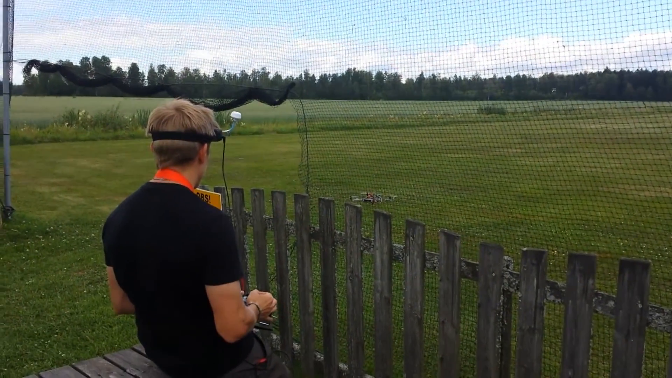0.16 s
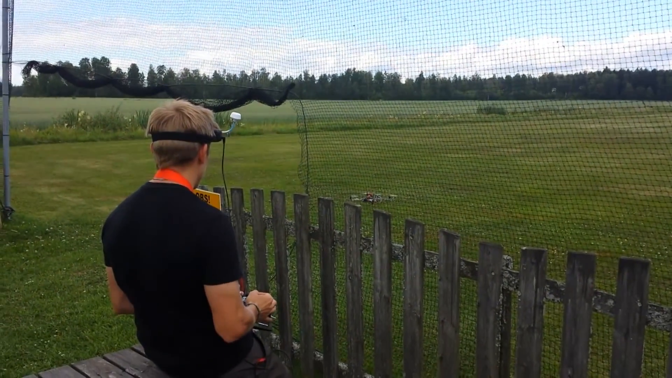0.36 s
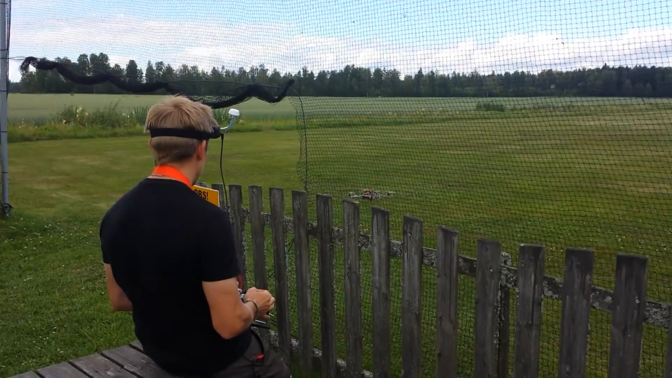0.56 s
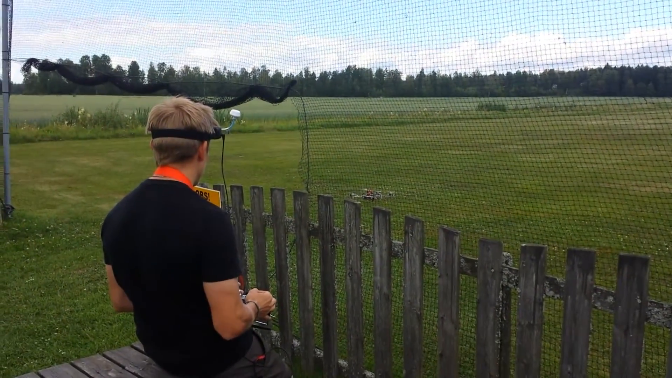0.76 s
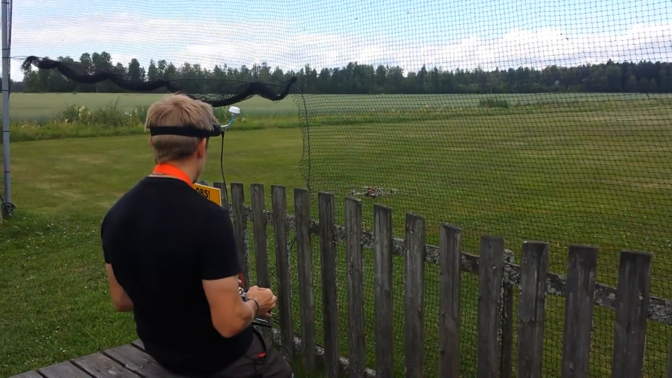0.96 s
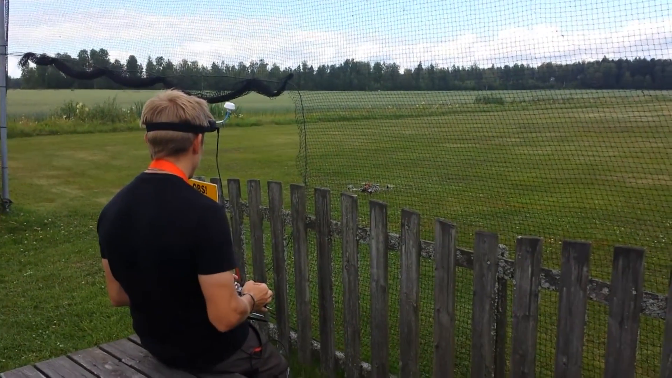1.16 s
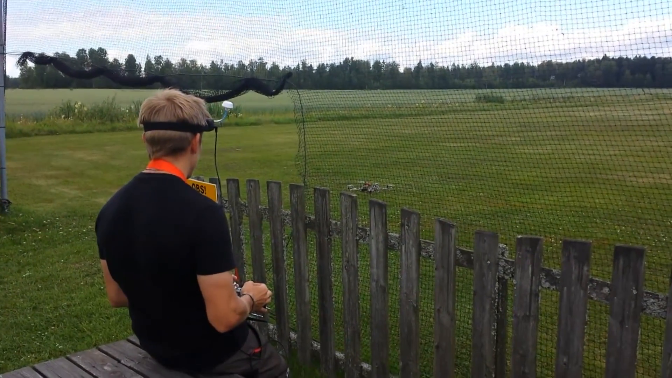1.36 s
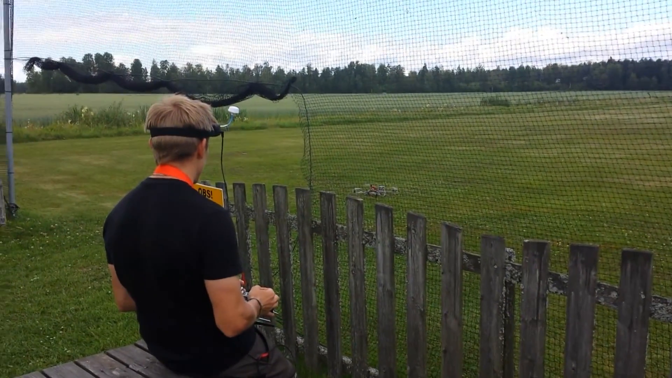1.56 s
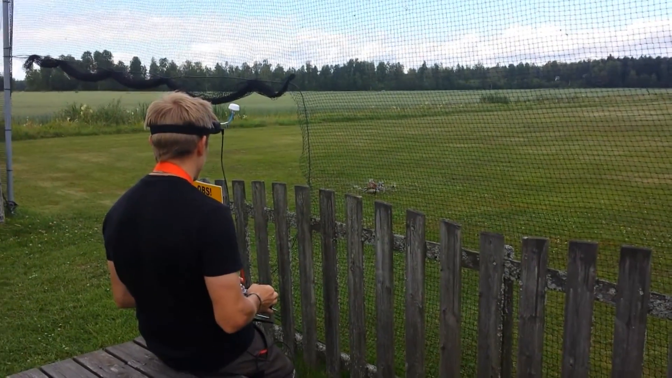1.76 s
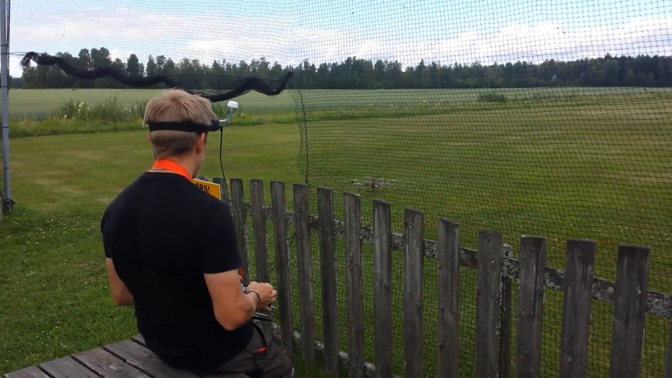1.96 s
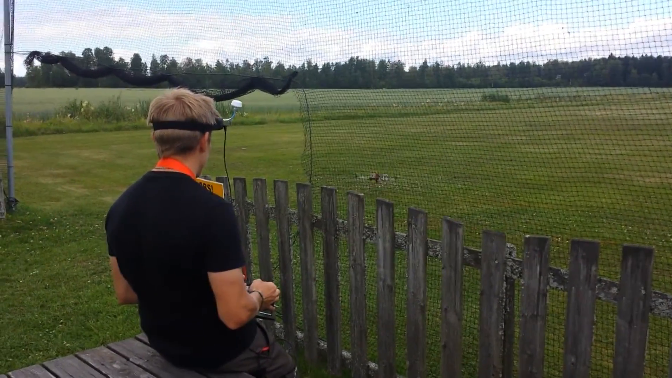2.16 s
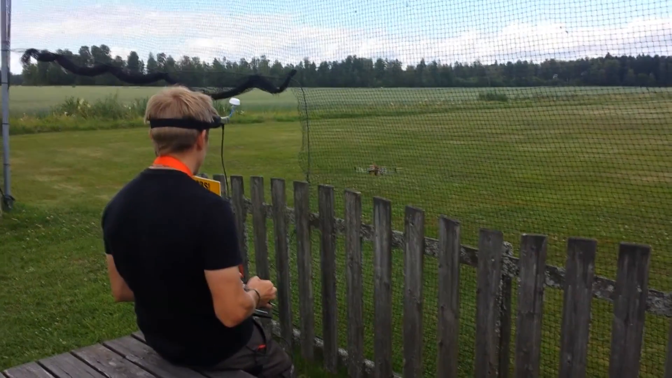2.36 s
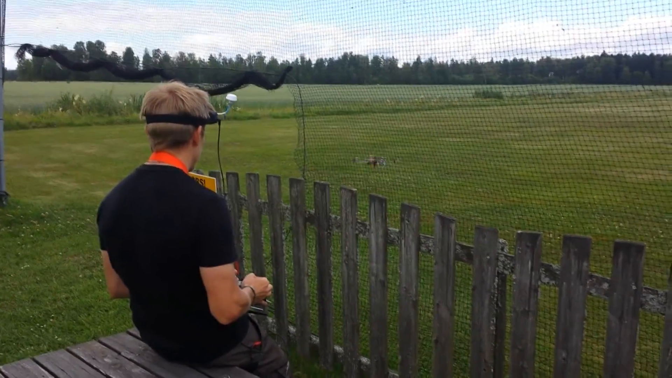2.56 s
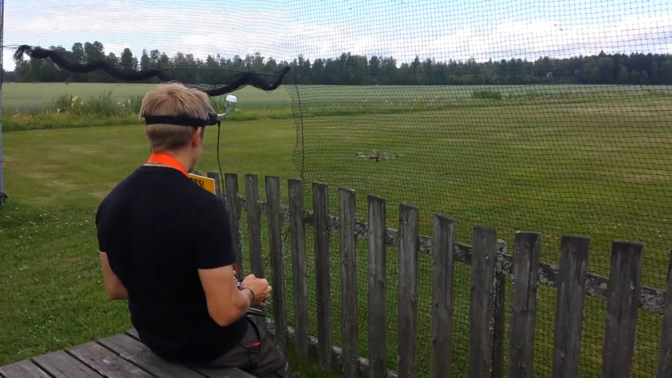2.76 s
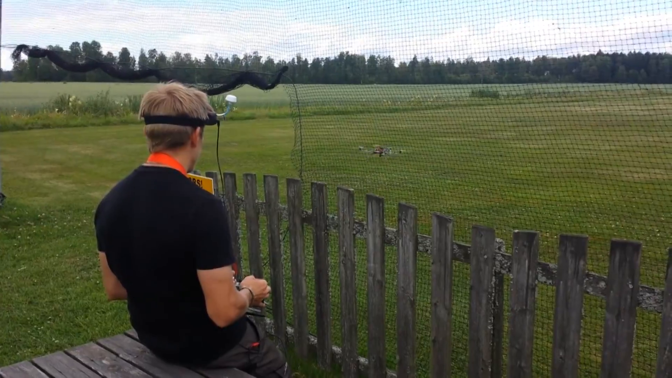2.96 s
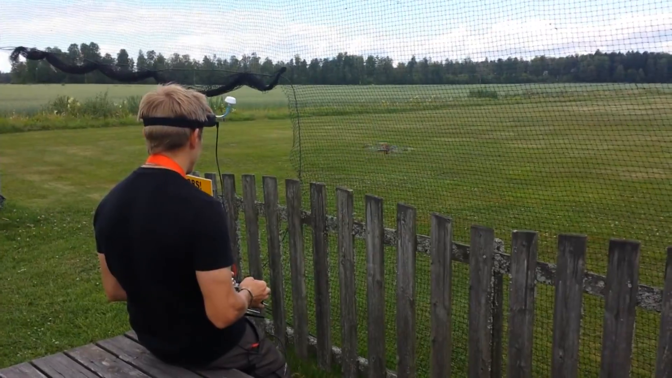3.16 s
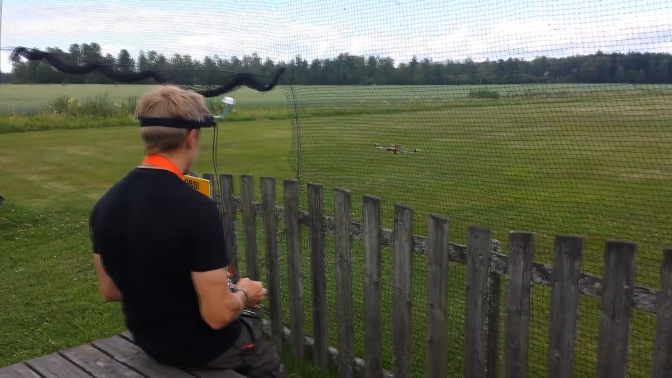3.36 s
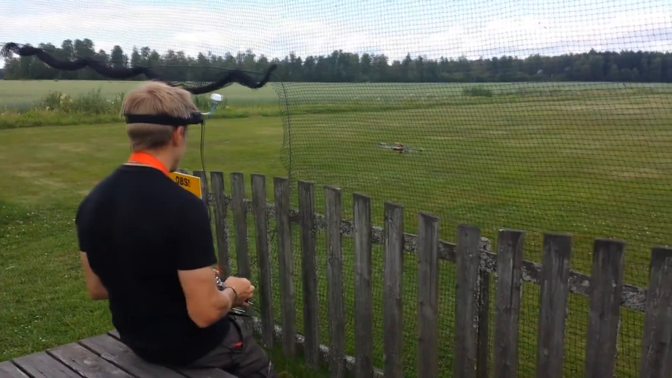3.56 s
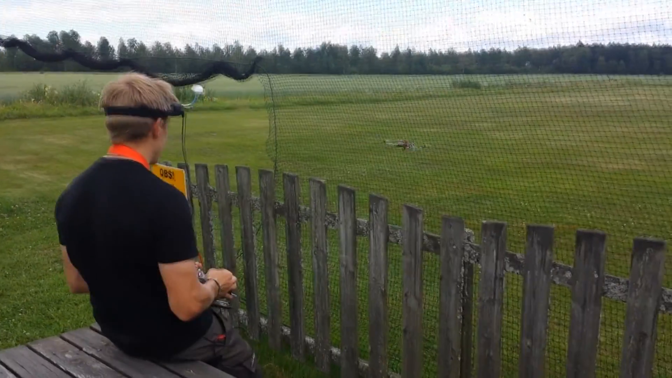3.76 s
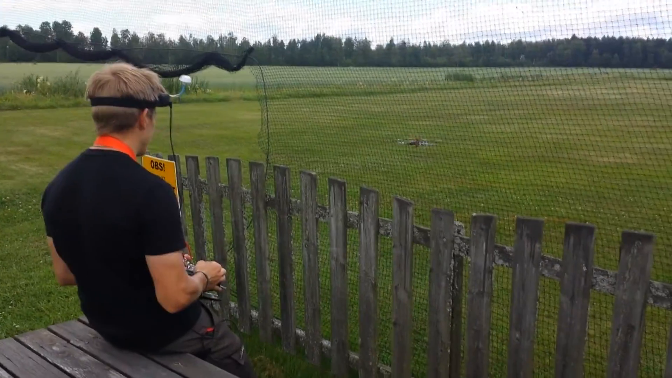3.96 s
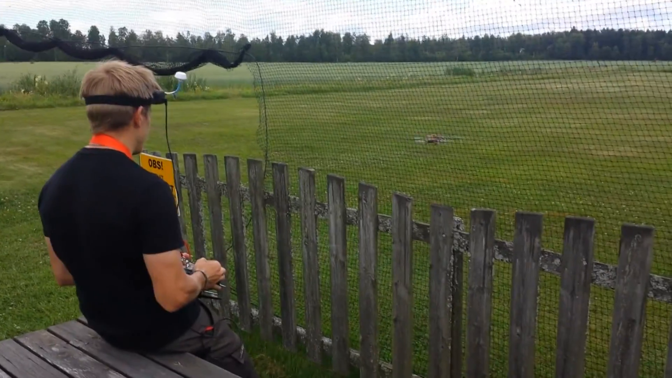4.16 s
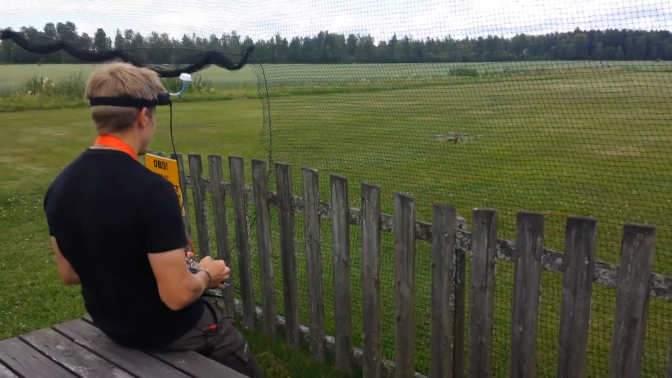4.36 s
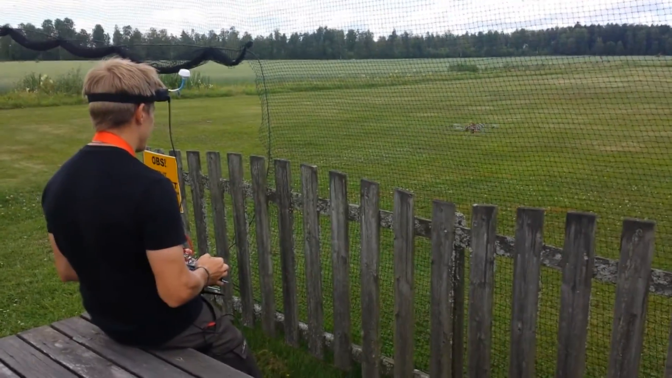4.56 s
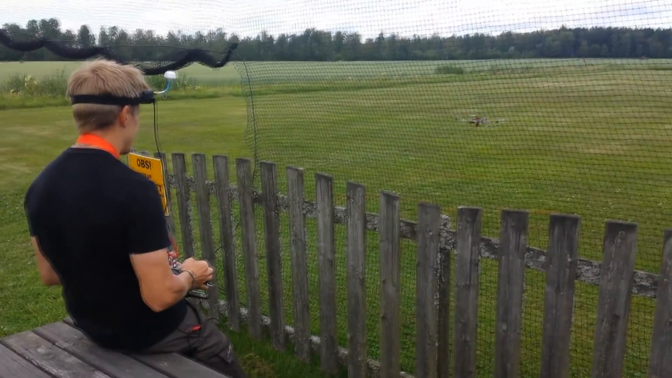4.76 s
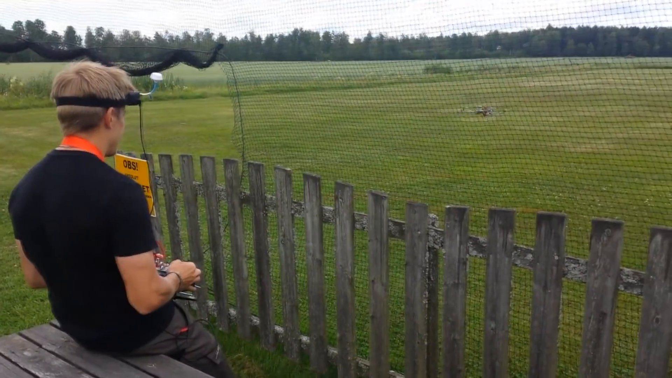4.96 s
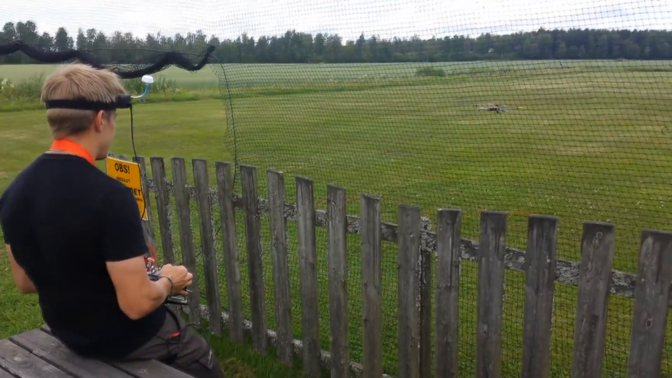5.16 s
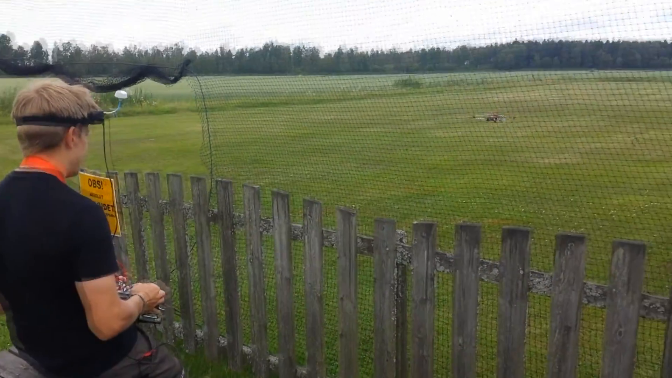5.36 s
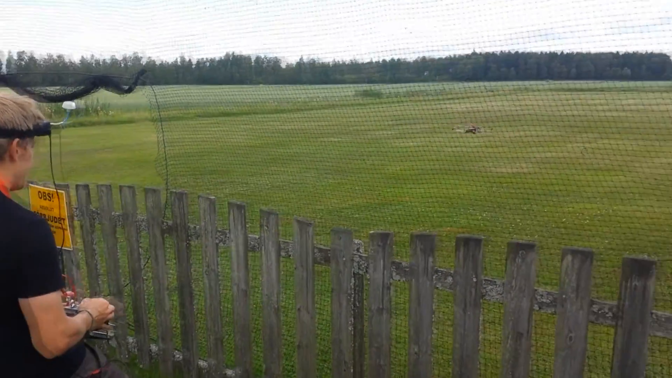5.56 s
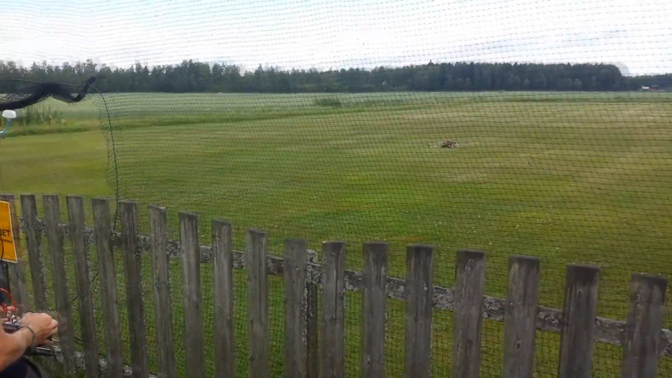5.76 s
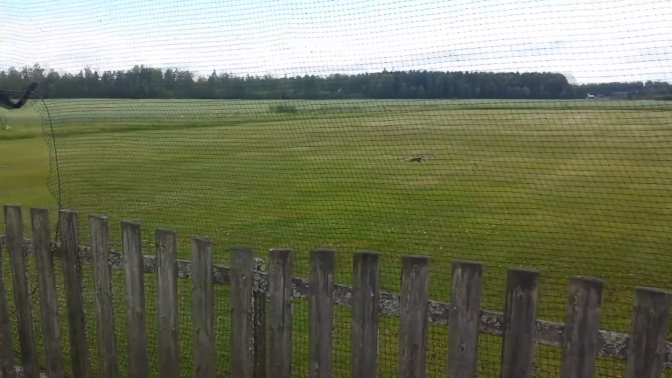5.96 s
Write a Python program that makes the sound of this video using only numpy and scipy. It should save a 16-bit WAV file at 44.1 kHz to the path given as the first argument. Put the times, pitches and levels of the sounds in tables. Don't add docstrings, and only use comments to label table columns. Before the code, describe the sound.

A small quadcopter's electric motors whine up from rest, then its propellers buzz louder as it lifts off and flies away over open grass.

```python
import sys
import numpy as np
from scipy import signal
from scipy.fft import rfft, irfft, next_fast_len
from scipy.io import wavfile
from scipy.ndimage import uniform_filter1d, map_coordinates

SR = 44100
rng = np.random.default_rng(int(sys.argv[2]) if len(sys.argv) > 2 else 0)


def makeup_ratio(level_db):
    decades = np.asarray(level_db, float) / 20
    return 10 ** decades


def unload_wav(signal):
    wavfile.write(
        sys.argv[1],
        SR,
        np.round(np.clip(np.atleast_2d(signal).T, -1, 1) * 32767).astype(np.int16),
    )


N = 264688
TIME = np.arange(N) / SR
SIZE = next_fast_len(N)
STEADY = [(0, 0)] * 4


def rms_one(x):
    return x / np.sqrt(np.mean(x ** 2) + 1e-20)


def even_out(x, span):
    power = uniform_filter1d(uniform_filter1d(x ** 2, size=span), size=span)
    return x / np.sqrt(power)


def in_time(rows):
    s, *columns = np.transpose(rows)
    return [np.interp(TIME, s, column) for column in columns]


def at_hz(points):
    hz, value = np.transpose(points)
    bins_hz = np.arange(SIZE // 2 + 1) * SR / SIZE
    return np.interp(np.log(bins_hz + 1), np.log(hz), value)


def colour(x, gain):
    return irfft(rfft(x, SIZE) * gain, SIZE)[..., :N]


def resonate(x, hz, width):
    r = np.exp(-np.pi * width / SR)
    feedback = [1, -2 * r * np.cos(2 * np.pi * hz / SR), r * r]
    return signal.lfilter([(1 - r * r) / 2, 0, (r * r - 1) / 2], feedback, x)


def flicker(depth_db, rate):
    knots = rng.standard_normal(int(rate * N / SR) + 2)
    return np.interp(TIME, np.linspace(0, N / SR, len(knots)), makeup_ratio(depth_db * knots))


def lines(multiples, levels_db, turns, base, depth_db, rate):
    out = np.zeros(N)
    for turn, (carrier, motor_db) in zip(turns, base):
        for multiple, level_db in zip(multiples, levels_db):
            phase = carrier + multiple * turn + rng.random()
            sine = np.sin(np.float32(2 * np.pi * (phase % 1)))
            out += flicker(depth_db, rate) * makeup_ratio(level_db + motor_db) * sine
    return out


# [start_s, share of the idle speed]
SPIN_UP = [(0, .38), (.1, .51), (.2, .65), (.3, .73), (.4, .79), (.55, .875), (.7, .917), (.87, 1)]


def spun_up(stretch=1):
    return np.interp(TIME / stretch, *np.transpose(SPIN_UP))


def lifted():
    lift_off_s, span_s = 1.44, 0.091
    return 1 / (1 + np.exp((lift_off_s - TIME) / span_s))


# [start_s, speed in turns per s]
FRONT_LEFT_SPEED = [(1.22, 69.3), (1.5, 75.4), (1.71, 72.7), (1.99, 83.1), (2.35, 85.6), (2.75, 73.3),
                    (2.91, 75), (3.46, 72.9), (3.72, 73.3), (3.85, 70.8), (4.15, 84.2), (4.62, 79.5),
                    (4.78, 73.6), (4.9, 71.6), (5, 72), (5.2, 68.6), (5.32, 68.6), (5.46, 69.9),
                    (5.65, 67.5), (5.82, 72.2), (6, 71.5)]
FRONT_RIGHT_SPEED = [(.9, 72.3), (1.24, 72), (1.42, 78.7), (1.85, 80.5), (2.11, 77.7), (2.35, 80.2),
                     (2.6, 77.6), (3, 80), (3.15, 78.6), (3.49, 78.6), (3.74, 75.6), (3.91, 85.6),
                     (4.13, 88.2), (4.72, 87.4), (4.9, 82), (5.15, 78), (5.52, 77.4), (6, 79.4)]
REAR_LEFT_SPEED = [(.9, 64.3), (1.27, 65.2), (1.66, 80), (2.12, 80.7), (2.3, 77.2), (2.5, 81.4),
                   (2.75, 78.2), (2.91, 83.8), (3.14, 76.6), (3.35, 83.6), (3.58, 76.8), (3.78, 81.6),
                   (3.89, 78.4), (4.06, 81.8), (4.16, 80.2), (4.29, 82.8), (4.42, 80.2), (4.52, 78.4),
                   (4.65, 80.6), (4.8, 80.6), (5.03, 73.6), (5.25, 73.9), (5.45, 71.2), (5.62, 72.2),
                   (5.88, 69.7), (6, 73)]
REAR_RIGHT_SPEED = [(.9, 69.6), (1.28, 69.8), (1.76, 84), (1.9, 82), (2.02, 76), (2.2, 71.8), (2.33, 69.4),
                    (2.45, 71.3), (2.6, 76), (2.67, 78.5), (3.1, 79), (3.36, 72.7), (3.73, 80.8),
                    (4.12, 80.2), (4.39, 85.5), (4.75, 84.6), (4.92, 81.8), (5.1, 76.8), (5.22, 76.1),
                    (5.45, 77.5), (5.68, 75.2), (5.79, 79.5), (6, 78)]
SPIN_UP_STRETCH = [.93, 1, .92, 1]


def rotor_speeds():
    tables = (FRONT_LEFT_SPEED, FRONT_RIGHT_SPEED, REAR_LEFT_SPEED, REAR_RIGHT_SPEED)
    rotors = [in_time(rows)[0] for rows in tables]
    starting = np.array([spun_up(stretch) for stretch in SPIN_UP_STRETCH])
    speeds = uniform_filter1d(starting * rotors, size=2800, mode="nearest")
    hunting = np.array([20 * np.log10(flicker(1, 16)) for rotor in rotors])
    return speeds + 0.3 * lifted() * hunting


# [start_s, pitch_hz]
SWITCHING_PITCH = [(0, 7791), (.6, 7766), (1.5, 7754), (2.1, 7761), (3, 7753), (3.6, 7755), (4.3, 7740),
                   (5.1, 7750), (6, 7742)]
# [pitch off the middle_hz, level_db]
CLOCKS = [(-7.5, 0), (7.5, -1), (-18, -13), (3, -15)]


def controller_clocks():
    middle, = in_time(SWITCHING_PITCH)
    return [(np.cumsum(middle + off_hz) / SR, level_db) for off_hz, level_db in CLOCKS]


# [start_s, bell_level_db, controller_level_db]
MOTOR_EFFORT = [(0.0, -40.5, -42), (0.58, -49.5, -41), (0.68, -33, -46.5), (0.9, -47.5, -46.5),
                (1.44, -35, -40), (1.85, -47, -28.5), (1.92, -34.5, -35), (2.09, -41.5, -36),
                (2.8, -33, -31.5), (3.48, -29.5, -28.5), (3.61, -29.5, -34.5), (3.76, -29.5, -29),
                (3.89, -29, -36), (4.55, -33, -41.5), (4.93, -30, -40), (5.06, -29.5, -34),
                (5.28, -36, -35), (5.78, -31.5, -35), (6.0, -27, -32.5)]


def motor_effort():
    return in_time(MOTOR_EFFORT)


def motors(turns):
    clocks = controller_clocks()
    level = [(clock, 0) for clock, level_db in clocks]
    tones = bell(turns, level) + solos(turns, level)
    tones += switching_tones(turns, clocks, level)
    tones += commutation(turns)
    tones += winding(turns, level)
    return np.array([tones, flicker(5.44, 60) * tones])


MAGNET_MULTIPLES = [56, 63, 68, 70, 72, 77, 84]
MAGNET_LEVELS = [-4, -1, -5, -1, -5, -4, -4]
LOW_NEIGHBOURS = [-35, -28, -21]
LOW_NEIGHBOUR_LEVELS = [-2, 4, 4]
# [pitch_hz, width_hz, level_db]
BELL_RINGS = [(4930, 70, 6), (5450, 350, 4)]
# [pitch_hz, level_db]
WHINE = [(3000, -62), (4300, 0), (4900, 17.5), (5500, 2.5), (6300, -10), (9000, -8.5)]


def bell(turns, clocks):
    force = lines(MAGNET_MULTIPLES, MAGNET_LEVELS, turns, STEADY, 5.0, 8)
    force += lines(LOW_NEIGHBOURS, LOW_NEIGHBOUR_LEVELS, turns, clocks, 5.0, 6.4)
    rough_db = np.interp(TIME, [.35, .55], [27, 0])
    force += makeup_ratio(rough_db - 7) * flicker(6, 13) * rng.standard_normal(N)
    ringing = force + sum(makeup_ratio(level_db) * resonate(force, hz, width) for hz, width, level_db in BELL_RINGS)
    ringing = even_out(colour(ringing, makeup_ratio(at_hz(WHINE))), 6000)
    locked = np.interp(TIME, [.45, .6], [0, 1])
    song = locked * makeup_ratio(-3) * singing(turns, clocks)
    return makeup_ratio(motor_effort()[0]) * (makeup_ratio(-6 * locked) * ringing + song)


SINGING_MAGNETS = [63, 70]
SINGING_NEIGHBOURS = [-35, -28]
# [magnet_low_db, magnet_high_db, neighbour_low_db, neighbour_high_db]
MOTOR_VOICES = [(-9, -1, -5, -4), (-9, -8, -6, 0), (-14, -3, 1, -4), (-6, -7, -3, -4)]
# [pitch_hz, width_hz, level_db]
SHARP_RINGS = [(4900, 380, 0), (5330, 520, -3.5)]


def singing(turns, clocks):
    force = 0
    for turn, clock, voice_db in zip(turns, clocks, MOTOR_VOICES):
        force = force + lines(SINGING_MAGNETS, voice_db[:2], [turn], STEADY, 2.0, 6)
        force = force + lines(SINGING_NEIGHBOURS, voice_db[2:], [turn], [clock], 2.0, 6) * lifted()
    song = 0
    for hz, width, level_db in SHARP_RINGS:
        song = song + makeup_ratio(level_db) * resonate(resonate(force, hz, width), hz, width)
    unloaded = np.interp(TIME, [.45, .75, 1.29, 1.34], [0, 1, 1, 0])
    alone = lines([71], [-2], turns[1:2], STEADY, 2.5, 6)
    return flicker(2.04, 40) * (song + unloaded * alone)


SOLO_TONES = dict(a=(1, -70), b=(0, -56), c=(2, -63), d=(1, -49), e=(1, 42), f=(1, 84), g=(1, 71),
              h=(0, 70), i=(2, 70), j=(3, -35), k=(0, -35), l=(2, -35), m=(3, 63), n=(1, -35), o=(1, -28),
              p=(0, 66), q=(0, 74), r=(0, -28), s=(2, -35), t=(2, -28), u=(3, -28), v=(2, -21), w=(2, -21),
              x=(3, 70), y=(2, 84), z=(1, 56))
# [middle_s, half_length_s, level_db]
SOLO_SWELLS = dict(a=[(.14, 0.027, -39)], b=[(.29, 0.039, -43)], c=[(.3, 0.014, -38.5)],
               d=[(.41, 0.032, -45)], e=[(.1, 0.035, -69), (.22, .06, -80), (.35, 0.077, -55)],
               f=[(.11, 0.032, -63), (.22, 0.046, -64)], g=[(.7, 0.017, -29.5), (.9, 0.035, -43)],
               h=[(.8, 0.044, -38), (1.3, 0.025, -32), (5.29, 0.11, -25), (5.55, 0.11, -28)],
               i=[(1.41, 0.016, -29.5)], j=[(1.68, 0.016, -32), (4.8, 0.039, -26.5), (4.92, 0.087, -26.5),
               (5.28, 0.19, -33)], k=[(1.9, 0.048, -31), (3.75, 0.041, -28.5), (4.02, 0.041, -30)],
               l=[(2.3, 0.81, -39), (3.2, 0.32, -38), (3.93, 0.093, -32), (1.94, 0.039, -28.5),
               (2.13, 0.033, -31.5), (2.51, 0.027, -28), (2.81, 0.02, -27.5), (3.01, 0.04, -28),
               (3.27, 0.017, -29.5), (3.45, 0.029, -26), (3.74, 0.084, -23.5), (4.1, 0.037, -48),
               (4.36, 0.045, -30)], m=[(2.67, 0.086, -30), (5.85, 0.083, -28.5), (5.99, 0.058, -24.5)],
               n=[(2.02, 0.058, -32.5), (3.1, 0.024, -34.5)], o=[(3.95, 0.065, -38), (4.2, 0.15, -40),
               (4.6, 0.15, -33.5), (4.98, 0.066, -51)], p=[(4.78, 0.012, -20)], q=[(5.45, 0.041, -39),
               (5.62, 0.12, -27)], r=[(.6, 0.2, -61), (1.05, 0.45, -57), (2.5, 0.21, -37.5),
               (3.4, .15, -46), (4.95, 0.1, -64)], s=[(1.0, 0.43, -55)], t=[(1.0, 0.4, -59),
               (2.75, 0.16, -37)], u=[(3.35, 0.23, -41), (5.45, .12, -49)], v=[(3.53, 0.13, -44)],
               w=[(5.1, 0.15, -50)], x=[(.2, 0.078, -65), (1.05, 0.19, -48)], y=[(5.62, .1, -44)],
               z=[(.25, 0.13, -69)])


def solos(turns, clocks):
    out = np.zeros(N)
    for name, (motor, multiple) in SOLO_TONES.items():
        level = 0
        for s, span, level_db in SOLO_SWELLS[name]:
            level = level + makeup_ratio(level_db) * np.exp(-((TIME - s) / span) ** 2)
        base = clocks[motor] if multiple < 0 else (0, 0)
        out += level * lines([multiple], [3.0], [turns[motor]], [base], 2.2, 30)
    return out


HIGH_NEIGHBOURS = [-1, 1, 28, 35, 42]
HIGH_NEIGHBOUR_LEVELS = [-26, -25, -33, -38, -34]


def switching_tones(turns, clocks, level):
    octave = [(2 * clock, level_db) for clock, level_db in clocks]
    loud_octave = [(2 * clocks[1][0], 0)]
    tones = lines([0], [0], turns, clocks, 3.27, 6.7)
    tones += lines(HIGH_NEIGHBOURS, HIGH_NEIGHBOUR_LEVELS, turns, level, 2.9, 8.0)
    tones += lines([-14], [-33], turns, octave, 7.3, 5)
    idle = lines([42], [-24], turns[:2], level[:2], 2.0, 6)
    idle += np.interp(TIME, [.6, .8], [0, 1]) * lines([84], [-27], turns[1:2], level[1:2], 2.0, 6)
    idle += np.interp(TIME, [.5, .6], [0, 1]) * lines([-21], [-30], turns[1:2], loud_octave, 2.0, 6)
    tones += (1 - lifted()) * idle
    return makeup_ratio(motor_effort()[1]) * rms_one(tones)


# [start_s, front_left_db, front_right_db, rear_left_db, rear_right_db]
ARM_LEVELS = [(0, -15, -8, -4, -25), (1.2, -9, -2.5, -11, -13), (1.6, -6, -14, -13, -6),
              (1.9, 1.5, -8.5, -6, -9), (2.15, -18, 0, -2, -5), (2.5, -1, -10, -9, -3),
              (2.85, -9, -11, -18, -11), (3.15, -2.5, -6, 7, -8), (3.35, -3, -8, -17, -10),
              (3.55, -6.5, -5, -18, 4), (3.7, -7.5, -3, -5, -8), (3.9, -6.5, -17, -13, -21),
              (4.15, -23, -17, -9, -9), (4.72, -11, -12, -8, -13), (5, -6.5, -20, -7.5, -14),
              (5.3, -6, -21, -8.5, -3), (5.65, -7, -22, -2.5, -7), (5.82, -3.5, -16, -7, -7),
              (6, -11, -16, 7, -4)]
# [pitch_hz, width_hz]
ARM_RING = (3100, 520)


def commutation(turns):
    still = [(0, level_db) for level_db in in_time(ARM_LEVELS)]
    steps = lines([42], [0], turns, still, 2.5, 18)
    steps = resonate(resonate(steps, *ARM_RING), *ARM_RING) + makeup_ratio(-9) * steps
    front_db = np.interp(TIME, [3.6, 3.75, 3.9, 4], [-5, -3, -3, -30])
    rear_db = np.interp(TIME, [3.9, 4, 4.9, 5.1], [-30, -4, -4, -30])
    steps += lines([126], [-17], turns[1:3], [(0, front_db), (0, rear_db)], 5.0, 6)
    level_db = -51.5 + 13 * lifted() - 26 * (1 - spun_up())
    return makeup_ratio(level_db - 1.0) * rms_one(steps)


POLE_NEIGHBOURS = [-14, 14]
POLE_NEIGHBOUR_LEVELS = [-1, -1.5]
# [start_s, level_db]
WINDING_CURRENT = [(0, -61), (.6, -65), (1.2, -63.5), (1.8, -54), (2.6, -53.5), (3.5, -46.5), (4, -51),
                   (4.6, -45.5), (5.1, -50), (6, -52.5)]


def winding(turns, level):
    tones = lines(POLE_NEIGHBOURS, POLE_NEIGHBOUR_LEVELS, turns, level, 2.0, 6.8)
    return makeup_ratio(in_time(WINDING_CURRENT)[0]) * tones


# [hover_level_db, db per turn per s, quietest_level_db, db less on the ground, db per s of flight]
BLADE_LEVELS = [(-45, 0.75, -60.5, 8.5, -1), (-49, 0.59, -63.5, 1.1, 0.07), (-43.5, 0.72, -57, 11.5, -0.22),
                (-43.5, 0.07, -54, -1, 0.2)]
# [start_s, hum_db, rush_db]
ROTOR_TILT = [(0, -4, -4), (.5, 1.5, 1.5), (.85, 3, 1.5), (1.2, 1, -1.5), (1.7, 3, -0.3), (2.2, 1.5, -0.9),
              (2.7, 2, 2), (2.95, 0, -1), (3.4, 1, -1.5), (3.8, 1.5, -2), (4.1, 0.5, -1.2), (4.6, 2, 0.4),
              (5, 1, -1.5), (5.45, -0.2, -1.5), (5.7, 2.5, 1), (6, 3.5, 0.5)]


def propellers(turns, excess):
    hum_db, rush_db, hiss_db, treble_db = (
        np.maximum(level_db + slope * excess - ground_db * (1 - lifted()) + fade_db * (TIME - 3), quietest_db)
        for level_db, slope, quietest_db, ground_db, fade_db in BLADE_LEVELS)
    hum_tilt_db, rush_tilt_db = in_time(ROTOR_TILT)
    rush_db = rush_db + rush_tilt_db + 7.5 * np.exp(-((TIME - 1.805) / 0.39) ** 2)
    hiss_db = hiss_db - 17 * (1 - spun_up())
    hum = makeup_ratio(hum_db + hum_tilt_db) * blade_hum(turns, excess)
    return hum + torn_air(turns, rush_db, hiss_db, treble_db)


HUM_MULTIPLES = [2, 4, 6, 8, 10]
HUM_LEVELS = [0, -10, -18, -13, -18]
# [start_s, level_db]
PROPELLER_WOBBLE = [(0, -48), (1.6, -11), (2.3, -7.5), (2.85, -8), (3.05, -23), (3.8, -12.5), (4.2, -3.5),
                    (4.6, -5.5), (5, -7.5), (6, -8.5)]
SLAP_MULTIPLES = [6, 8, 10]


def blade_hum(turns, excess):
    hum = rms_one(lines(HUM_MULTIPLES, HUM_LEVELS, turns, STEADY, 1.5, 20))
    wobble_db, = in_time(PROPELLER_WOBBLE)
    hum += lines([3], [0], turns[1:2], [(0, wobble_db)], 3.0, 6)
    slap_db = -29 + 2 * excess.clip(-10, 10)
    hum += makeup_ratio(slap_db) * lines(SLAP_MULTIPLES, [0, 2.5, -1.5], turns, STEADY, 5.0, 35)
    return hum


# [pitch_hz, level in db per Hz]
RUSH_COLOUR = [(88, -78), (150, -4), (176, -20), (206, -19.5), (317, -17), (395, -32), (520, -25.5),
               (629, -15), (930, -20), (1540, -14), (1780, -22), (2000, -13.5), (2800, -18.5), (3640, -72),
               (6160, -120)]
HISS_COLOUR = [(1470, -26.5), (2400, -12), (2750, -15.5), (3210, -11.5), (4200, -7.5), (5000, 3),
               (5900, -10.5), (7030, -17.5), (7470, -15), (8030, -9.5), (8170, -17), (9500, -21),
               (12400, -28), (20900, -120)]
TREBLE_COLOUR = [(5290, -22), (9000, -7), (11000, -15.5), (12600, -11), (13300, -4), (13900, -11),
                 (14800, -5.5)]


def torn_air(turns, rush_db, hiss_db, treble_db):
    chop = 1 + .15 * sum(np.cos(4 * np.pi * turn) for turn in turns) / 2
    rush = air(RUSH_COLOUR, rush_db + 3.0, 1.14, 14)
    hiss = air(HISS_COLOUR, hiss_db + 11.5, 0.53, 20)
    treble = air(TREBLE_COLOUR, treble_db, 3.3, 14)
    dull = signal.sosfilt(signal.butter(6, 13000, "low", fs=SR, output="sos"), treble)
    grounded = 0.67 * (1 - lifted())
    treble = (1 - grounded) * treble + grounded * dull
    return chop * (rush + hiss + treble)


# [pitch_hz, shared part from 0 to 1]
SHARED_NOISE = [(100, 1), (700, .75), (1500, .72), (2900, .85), (5000, .55), (9000, .3), (14000, .4)]


def air(spectrum, level_db, depth_db, rate):
    alike = np.clip(at_hz(SHARED_NOISE), 0, 1)
    shared, left, right = rfft(rng.standard_normal((3, SIZE)))
    pair = np.sqrt(alike) * shared + np.sqrt(1 - alike) * np.array([left, right])
    noise = irfft(makeup_ratio(at_hz(spectrum)) * pair, SIZE)[:, :N]
    return makeup_ratio(level_db) * flicker(depth_db, rate) * rms_one(noise)


def ground_echo(drone):
    share, width_hz = 0.9, 700
    far = share * np.clip((TIME - 4.15) / .2, 0, 1)
    drone = drone - far * resonate(drone, 11640, width_hz)
    sunk = share * np.exp(-((TIME - 4.77) / 0.72) ** 4)
    return drone - sunk * resonate(drone, 11300, width_hz)


# [pitch_hz, left minus right_db]
PORT_BALANCE = [(60, -6.0), (99, -1), (160, 1.5), (270, -3), (440, 7.5), (730, -1), (1210, 3), (1990, -2.5),
                (3290, 8.5), (5420, 25.5), (8950, 10), (14800, 45)]
# [start_s, delay in samples]
RIGHT_DELAY = [(0, 8.2), (3.5, 8.3), (4, 11.5), (5, 12.2), (6, 11.5)]


def at_ports(left, right):
    share = makeup_ratio(at_hz(PORT_BALANCE))
    lag, = in_time(RIGHT_DELAY)
    left = colour(left, 2 * share / (1 + share))
    right = colour(right, 2 / (1 + share))
    right = map_coordinates(right, [np.arange(N) - lag], order=3, mode="nearest")
    return np.array([left, right])


# [pitch_hz, level in db per Hz]
WIND_COLOUR = [(15, -4.5), (60, -5), (130, -17.5), (250, -32.5), (500, -56), (1000, -100)]
# [start_s, length_s, level_db, left minus right_db]
WIND_GUSTS = [(.02, 0.2, -100, 0), (1.124, 0.039, -56, -18), (1.252, 0.21, -51, -23),
              (1.494, 0.035, -44.5, -19), (1.602, 0.12, -60, -6), (1.782, 0.13, -67, 17),
              (2.032, 0.37, -51.5, -9), (2.5, 0.22, -61, -6), (3.094, 0.16, -59.5, -18.5),
              (3.36, 0.15, -59, -22), (3.943, 0.13, -75, 15), (4.157, 0.39, -66, -7),
              (4.65, 0.45, -66.5, -1), (5.3, 0.32, -73, 4), (5.773, 0.05, -60.5, 9)]


def wind():
    attack_s, release_s = 0.043, 0.058
    lumps = np.array([flicker(7.5, 40) * rng.standard_normal(N) for port in range(2)])
    rumble = even_out(colour(lumps, makeup_ratio(at_hz(WIND_COLOUR))), 4000)
    blowing = makeup_ratio(-71)
    for s, length, level_db, pan_db in WIND_GUSTS:
        rise = np.clip((TIME - s) / attack_s + 1, 0, 1)
        fall = np.exp(-np.maximum(TIME - s - length, 0) / release_s)
        blowing = blowing + rise * fall * makeup_ratio(level_db + pan_db / 2 * np.array([[1], [-1]]))
    return rumble * blowing * makeup_ratio(18.5)


# [start_s, level_db, port (0 left, 1 right), direction (+1 or -1), rise_ms]
PRESSURE_POPS = [
    (0.4928, 1, 1, 1, 0.0081),
    (1.86, -12.5, 0, 1, 0.52),
    (4.08, -9.5, 0, 1, 0.12),
]


def pops():
    out = np.zeros((2, N))
    for s, level_db, port, sign, rise_ms in PRESSURE_POPS:
        since = np.maximum(TIME - s, 0) / (rise_ms / 1000)
        crack = 1 + makeup_ratio(-4) * np.exp(-since / 8)
        out[round(port)] += np.sign(sign) * makeup_ratio(level_db) * -np.expm1(-since) * crack
    return out


def scene():
    speeds = rotor_speeds()
    turns = list(np.cumsum(speeds, axis=1) / SR)
    excess = speeds.mean(axis=0) - 78
    drone = ground_echo(motors(turns) + propellers(turns, excess))
    return at_ports(*drone) + wind() + pops()


def low_pass(x):
    return signal.sosfilt(signal.butter(12, 14660, fs=SR, output="sos"), x)


def record(dry):
    x = signal.sosfilt(signal.butter(2, 104, "high", fs=SR, output="sos"), dry)
    x = np.clip(x, -.8, .8)
    x = signal.sosfilt(signal.cheby2(12, 60, 15400, fs=SR, output="sos"), x)
    return low_pass(x)


dry = scene()
out = record(dry)
unload_wav(out)
```